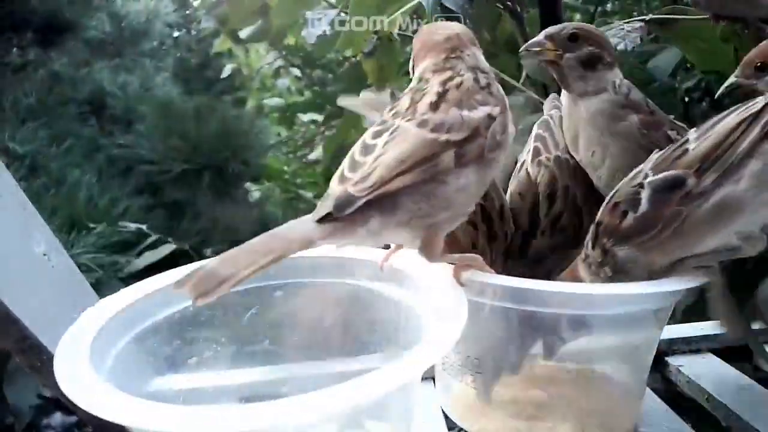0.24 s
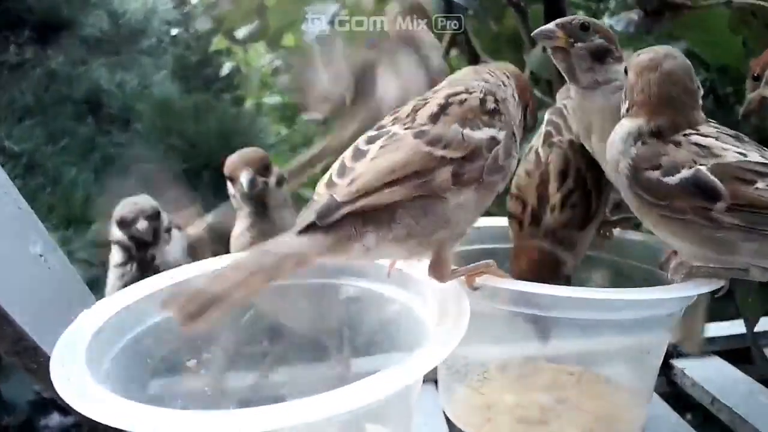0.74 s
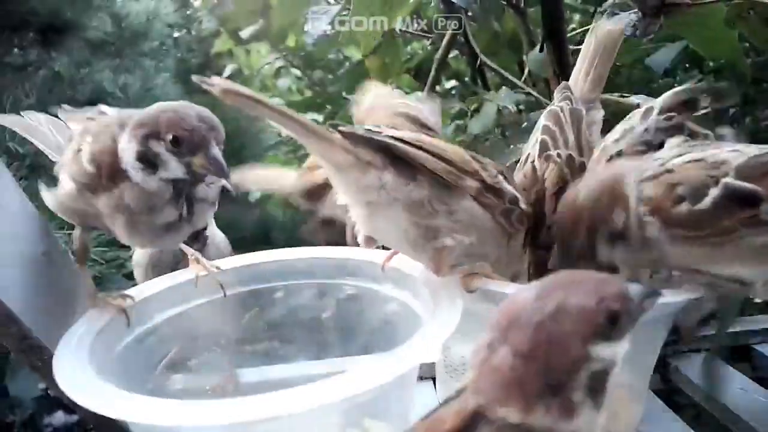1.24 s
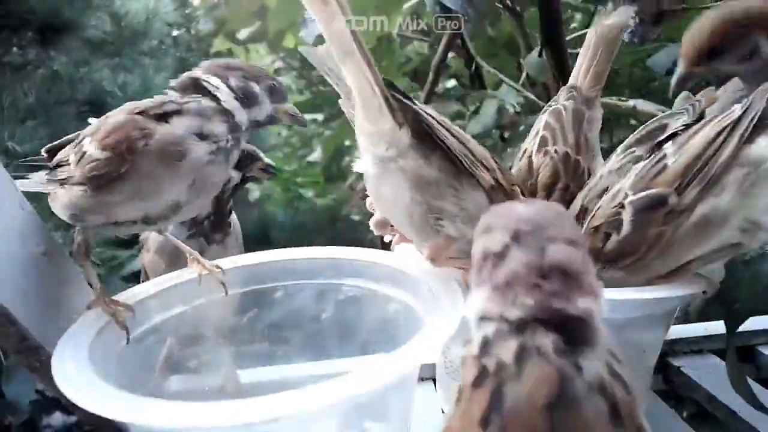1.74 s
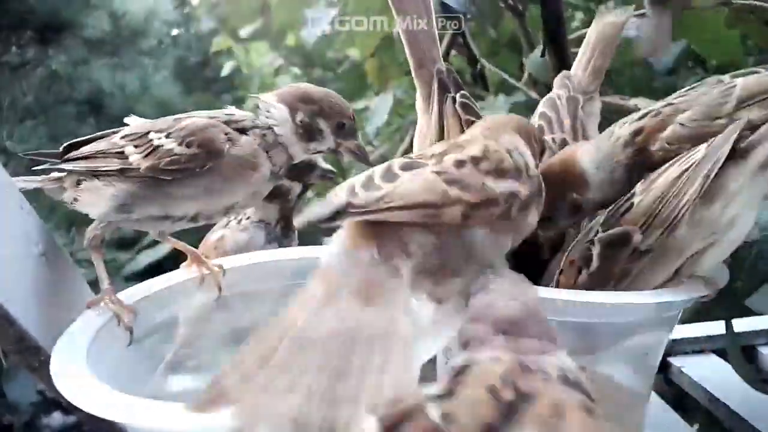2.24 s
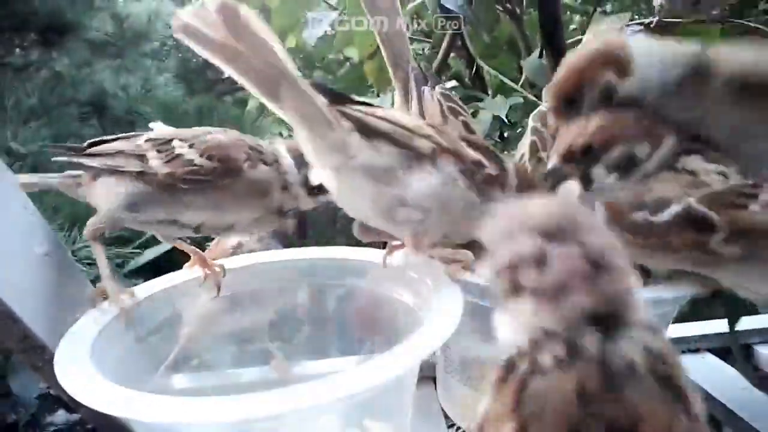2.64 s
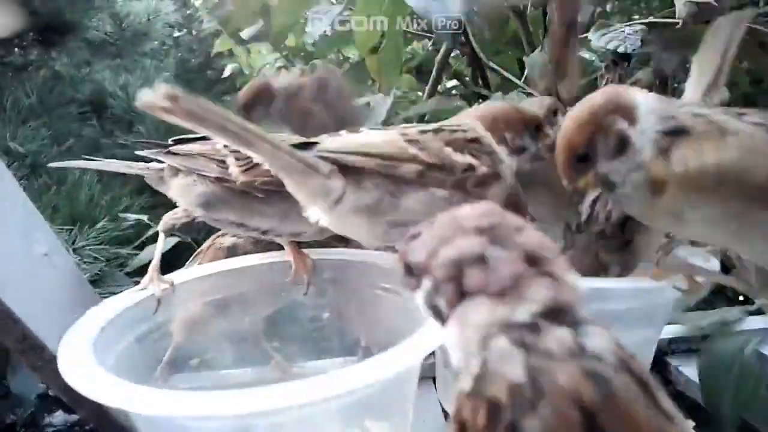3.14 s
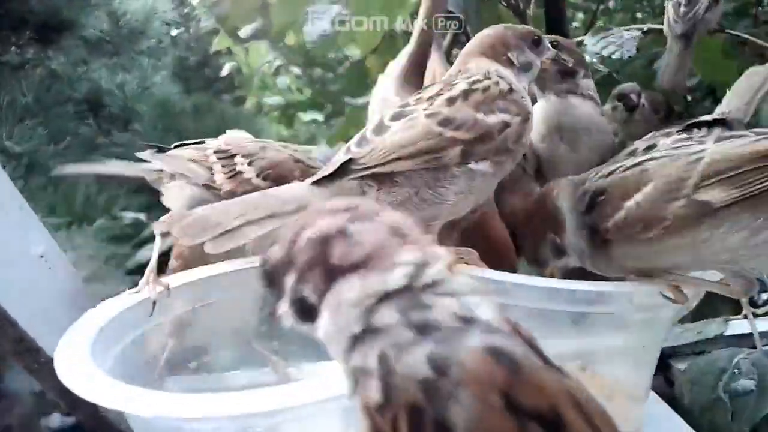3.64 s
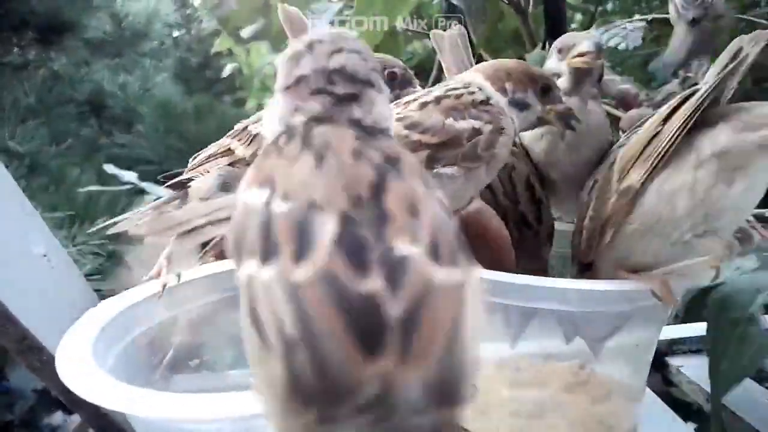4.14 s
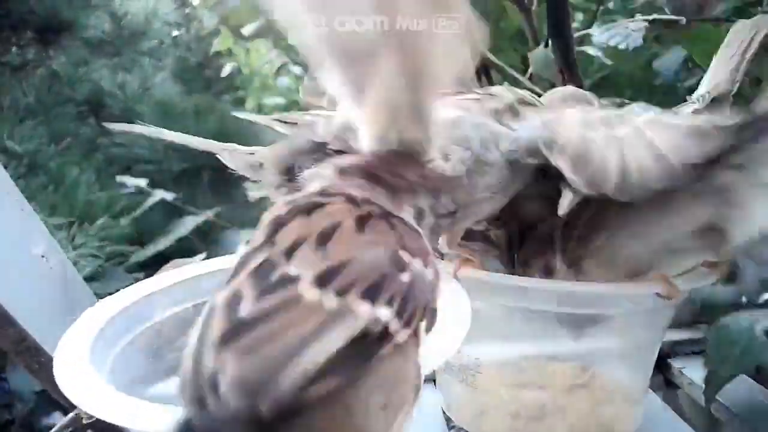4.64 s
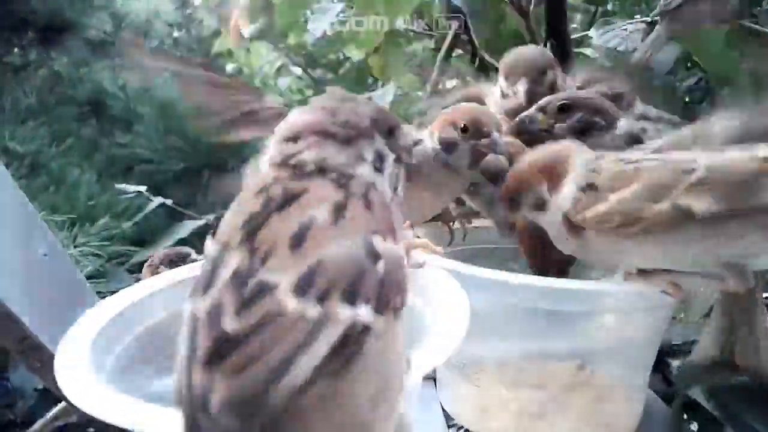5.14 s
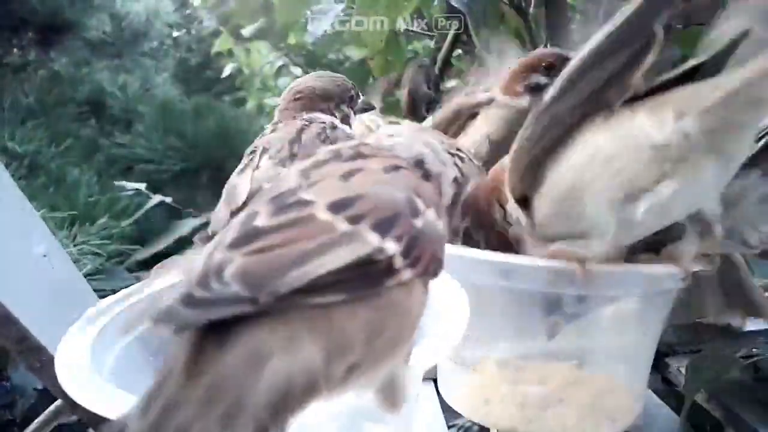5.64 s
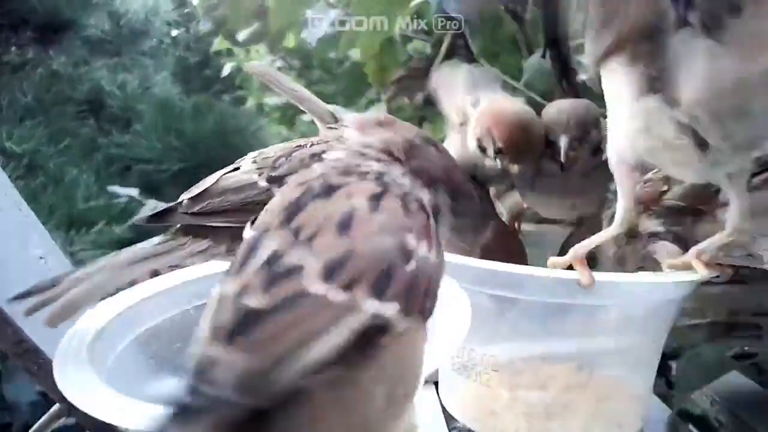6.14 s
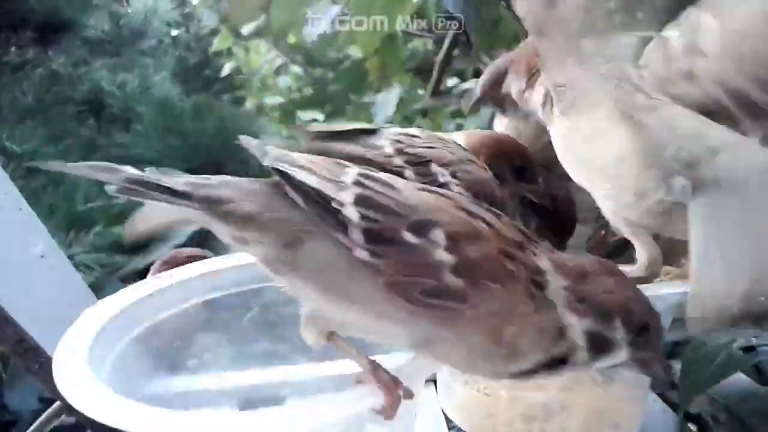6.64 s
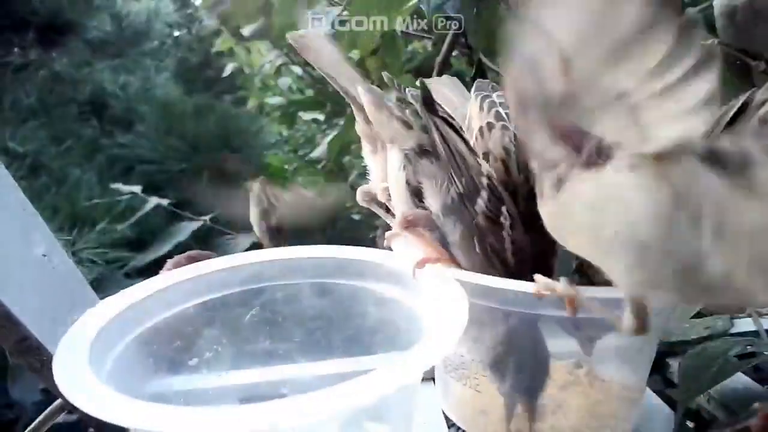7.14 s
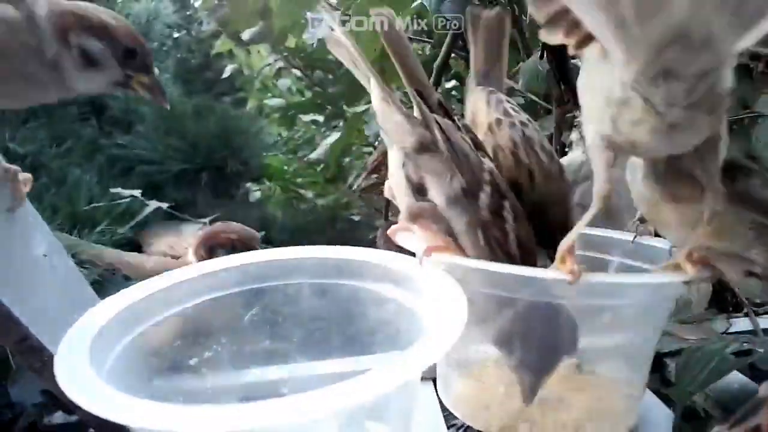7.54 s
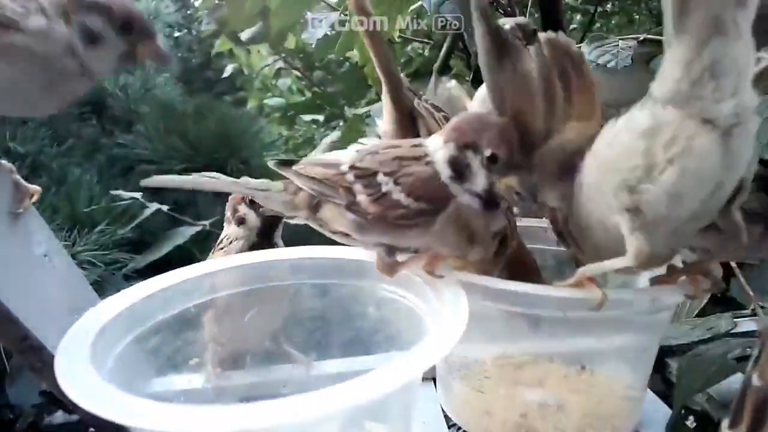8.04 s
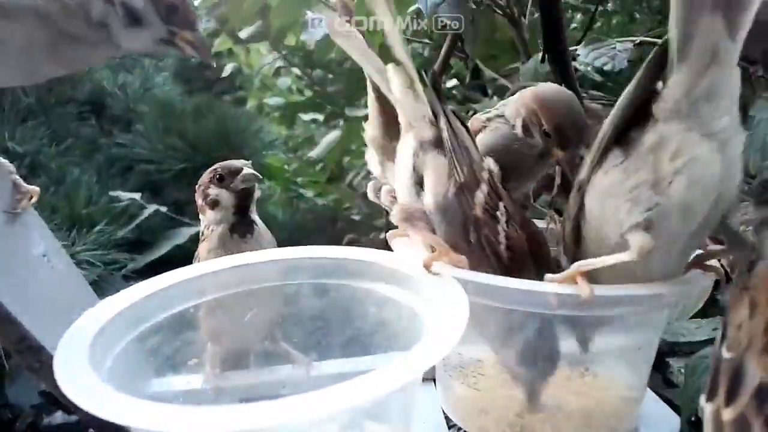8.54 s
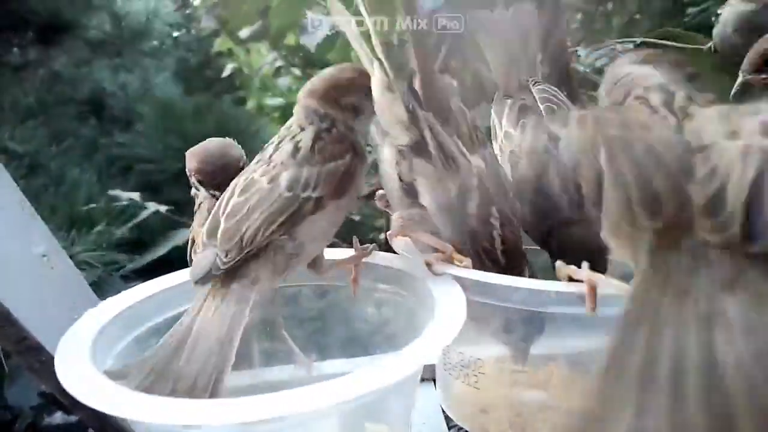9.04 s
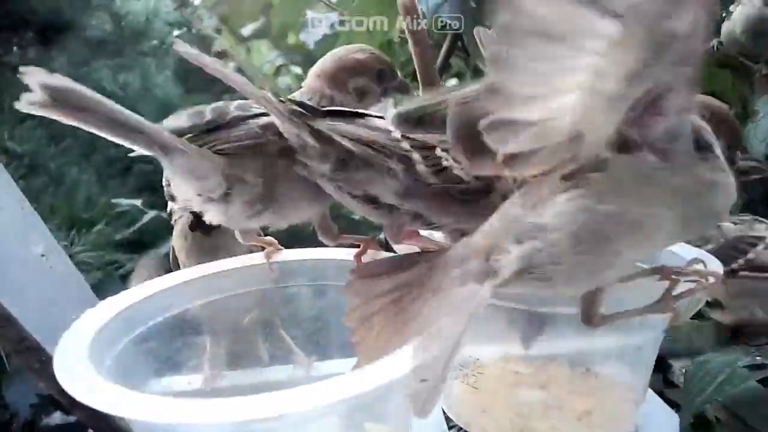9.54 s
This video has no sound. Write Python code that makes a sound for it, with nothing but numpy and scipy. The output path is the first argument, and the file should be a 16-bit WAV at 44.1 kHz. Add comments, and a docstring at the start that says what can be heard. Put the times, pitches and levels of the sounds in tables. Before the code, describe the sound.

Close to the microphone, sparrows hop and peck on thin plastic cups with dry ticks and hollow knocks. Sparse chips and thin whistles come first, one piercing near 2.5 seconds. From about five seconds raspy double chirps crowd together with hard wing flaps and a dull perch bump, continuing to the end over a low outdoor rumble. The sound sits on the left channel.

```python
"""Garden, close microphone: over a low rumble, claws and beaks tick on plastic seed cups and wings rustle and puff.
Tree sparrows join in from 1.2 s with double-arched scolds, single chips and thin whistles, two-voiced and rasping.
Scolds crowd together from about 5 s, with hard wing strokes and, at 6.2 s, one bump on the perch;
a far motor comes up after 8 s. Noise shaped by spectra makes the air and contacts; gliding tones make the calls.
The scene is on the left channel, with only a trace on the right; both carry mains hum and hiss."""
import sys
import numpy as np
from scipy import signal
from scipy.fft import rfft, irfft, next_fast_len
from scipy.io import wavfile
from scipy.ndimage import map_coordinates

SR = 44100
rng = np.random.default_rng(int(sys.argv[2]) if len(sys.argv) > 2 else 0)


def wav_record(signal):
    """Record a signal, one row per channel, as 16-bit PCM in the file named by sys.argv[1]."""
    frames = np.transpose(np.atleast_2d(signal))
    bounded = np.clip(frames, -1, 1)
    # unit amplitude maps onto the largest positive 16-bit level
    quanta = np.round(bounded * 32767).astype(np.int16)
    wavfile.write(sys.argv[1], SR, quanta)


N = 431738  # length [samples]

# Spectra, all relative: (frequency [Hz], density [dB per Hz])
# the garden around the microphone
GARDEN_SPECTRUM = [(59, -13.5), (100, -0.5), (145, -8.5), (178, -3.5), (368, -10.5), (512, -19.5),
                   (859, -18), (1080, -20), (1200, -16.5), (1960, -26), (2970, -36), (3810, -29),
                   (6380, -28.5), (14000, -77)]
# air drifting over the microphone
DRAUGHT_SPECTRUM = [(10, -14), (30, 11), (60, 7.5), (110, 1), (250, -39)]
# dull thud of the perch
PERCH_SPECTRUM = [(40, -9), (120, -2.5), (210, 2), (330, -5), (480, -14), (700, -30), (1500, -57)]
# feathers brushing
RUSTLE_SPECTRUM = [(400, -13), (800, 4.5), (1300, 4), (1800, -4.5), (2600, -2.5), (4500, -7), (7200, -4),
                   (9000, -17), (13000, -71)]
# stiff feathers dragged by a hard stroke
SWISH_SPECTRUM = [(500, -25), (900, -16), (1350, 3), (1900, 3), (2800, 1), (4500, -7), (7000, -2),
                  (10000, -19), (13000, -30)]
HISS_SPECTRUM = [(30, 28), (350, 22), (700, 16), (1400, 7), (2800, 1), (5600, -2), (13000, 0)]

# Low outdoor rumble before its lift in garden(): (time [s], level [dB])
RUMBLE_LEVEL = [(0, -54), (.4, -48.5), (.6, -52), (.95, -48), (1.2, -53), (2.8, -52), (3.2, -47),
                (3.6, -52.5), (4.8, -51), (5.1, -48), (5.6, -50), (6.6, -51), (8, -53), (9.7, -53)]
# Far motor before its lift and fade-in in garden(): (time [s], level [dB])
MOTOR_LEVEL = [(7.9, -62), (8.18, -57), (8.416, -44.5), (9.048, -44.5), (9.122, -55), (9.7, -51)]
# Restlessness between flurries: (time [s], level [dB])
FIDGET_LEVEL = [(0, -60.5), (4.2, -62.5), (5.5, -54.5), (9.7, -59.5)]
# Flurries of wings and jostling bodies: (middle [s], half width [s], level [dB])
FLURRIES = [(0.388, 0.096, -51), (.88, .1, -55.5), (3.102, 0.16, -54.5), (4.602, 0.17, -55.5),
            (5.098, 0.14, -50), (5.42, 0.11, -47), (5.62, .12, -52.5), (5.892, 0.05, -44.5),
            (6.17, 0.11, -51), (6.56, 0.046, -53), (6.85, 0.08, -52.5), (7.6, 0.28, -58.5),
            (8.9, 0.11, -56)]
# Wing puffs at the microphone, before damping: (time [s], level [dB])
WING_PUFFS = [(.759, -29), (0.8, -27), (.844, -25), (.879, -24.5), (0.957, -20), (1.59, -24), (2.987, -27),
              (4.40, -28), (4.537, -29.5), (4.57, -26.5), (5.089, -20.5), (5.132, -23.5), (6.204, -16.5),
              (6.37, -28), (7.269, -25.5), (7.92, -29.5)]
# Hard wing strokes, relative to one another: (time [s], level [dB])
WING_STROKES = [(.37, -55), (1.597, -42), (3.01, -53), (4.614, -49), (5.139, -38), (5.365, -34.5),
                (5.42, -39), (5.468, -44), (5.522, -40), (5.572, -38), (5.648, -40), (5.70, -40),
                (5.765, -36), (5.858, -36), (5.935, -39.5), (6.115, -42), (6.539, -42)]
# Firm pecks and landings, before the lifts in cups(): (time [s], knock level [dB], tick level [dB])
PECKS = [(0.06, -39.5, -54), (.16, -58, -47), (0.362, -40, -44), (0.4, -44, -46.5), (0.4785, -49, -49),
         (0.7555, -45, -62), (0.925, -44, -44), (.989, -57, -46.5), (.9622, -44, -56), (1.1103, -44, -46),
         (1.3808, -45, -44.5), (1.586, -56, -51), (1.5962, -30.5, -37), (1.5524, -55, -51),
         (1.6277, -44.5, -49), (1.6816, -45, -56), (2.071, -45, -57), (2.199, -47, -49), (1.929, -58, -46),
         (2.099, -62, -45), (2.6153, -49, -54), (2.654, -60, -49), (3.0133, -39, -47.5),
         (3.105, -43.5, -39), (3.1368, -60, -46), (3.201, -56, -47.5), (3.3371, -50, -40.5),
         (3.481, -59, -46.5), (3.7337, -65, -47.5), (4.1624, -42.5, -49.5), (4.362, -41.5, -48),
         (4.614, -41, -43.5), (4.691, -44.5, -47), (4.9193, -44, -50), (5.882, -31.5, -58),
         (6.015, -36, -40), (6.1059, -33.5, -39), (6.8397, -51, -43), (6.8685, -47, -43),
         (7.8062, -49, -41), (7.8508, -46, -54), (8.8752, -39.5, -61), (8.8994, -54, -45),
         (9.202, -41.5, -40), (9.6782, -62, -43)]
# Resonances of a cup's hollow body: (frequency [Hz], width [Hz], level [dB])
CUP_BODY = [(810, 310, 1), (1260, 250, 8), (2320, 520, -4.5)]
# Resonances of its stiff rim: (frequency [Hz], width [Hz], level [dB])
CUP_RIM = [(3040, 900, 5), (4170, 1300, 4), (5740, 1600, 5), (7140, 760, 8), (9100, 3000, -7)]

# Radiation of the tones from the open beak: (frequency [Hz], gain [dB])
BEAK_RESPONSE = [(800, -5), (2000, 1.5), (7500, 0.5), (10000, -19.5), (13000, -8)]
# Colour of the rasp: (frequency [Hz], gain [dB])
RASP_RESPONSE = [(1000, -66), (1800, -2), (2600, -2.5), (4200, 0), (5600, -0.5), (6500, -4.5), (7600, -4.5),
                 (9000, -13), (11000, -14.5), (12500, -25)]
# Scolds: (time [s], main arch length [s], main crest [Hz], closing crest [Hz], opening rasp level [dB],
# main level [dB], closing level [dB], octave re tone before OCTAVE_LIFT_DB [dB], relative rasp [dB])
SCOLDS = [(1.245, .039, 4170, 3900, -49.5, -45, -46.5, -14, -4.5),
          (4.857, .017, 4000, 2950, -57, -32.5, -42.5, -30, -5.5),
          (5.165, .055, 4070, 3190, -41.5, -36.5, -39.5, -5, -4),
          (5.377, 0.051, 3820, 3100, -42.5, -41, -35.5, -6.5, -2),
          (5.569, 0.053, 3760, 3130, -42, -37.5, -38.5, 2, 0.5),
          (5.75, .049, 4070, 3160, -39.5, -39.5, -36.5, -3, -1.5),
          (5.949, 0.056, 3860, 3170, -36, -33.5, -33.5, -10, -4),
          (6.128, 0.054, 3850, 3400, -38.5, -28.5, -37, -16.5, -13),
          (6.234, .025, 4030, 2970, -55, -35.5, -40, -17.5, -14),
          (6.313, 0.056, 4090, 3410, -41.5, -28.5, -36.5, -25, -7.5),
          (6.413, .026, 4050, 2960, -49.5, -33.5, -41, -19, -11),
          (6.548, 0.062, 3810, 3140, -41.5, -30.5, -38.5, -27, -9.5),
          (6.959, 0.058, 4190, 3450, -48, -34.5, -32.5, -18.5, -7.5),
          (7.206, 0.053, 4190, 3540, -44.5, -31, -32, -14.5, -8.5),
          (7.396, 0.057, 3970, 3280, -44, -30.5, -36.5, -18, -6),
          (7.73, .051, 3970, 3150, -45, -27.5, -36.5, -44, -18),
          (8.076, 0.05, 3990, 3150, -43.5, -28.5, -37, -27, -12),
          (8.201, 0.027, 4290, 3360, -68, -39, -41, -22, -13),
          (8.459, 0.056, 3875, 3210, -43.5, -31, -37.5, -35, -14),
          (8.648, .025, 4040, 2800, -69, -40.5, -45, -24, -4),
          (8.782, .051, 3995, 3070, -48, -36, -37, -30, -7),
          (9.147, .05, 4190, 3290, -52, -34, -43.5, -30, -14),
          (9.474, 0.023, 4000, 3330, -50, -38.5, -37.5, -26, -5.5)]
# Single arched chips: (time [s], rise [s], fall [s], start [Hz], crest [Hz], level [dB],
# second voice pitch ratio, second voice re first [dB], relative rasp [dB])
CHIPS = [(1.515, 0.013, 0.034, 4060, 4800, -54.5, .86, 0, -1),
         (1.847, .008, 0.026, 3690, 4180, -48.5, 0.71, -3, -1),
         (2.061, 0.039, 0.04, 4980, 5720, -44, .75, -8, -5),
         (2.239, 0.0087, 0.024, 3630, 4100, -46.5, .68, -7.5, -2.5),
         (2.489, 0.015, .012, 4500, 5720, -21, .74, -18, -13.5),
         (2.516, 0.0056, 0.036, 4300, 4710, -32.5, 0.85, -9, -12),
         (2.902, 0.028, 0.021, 2260, 4870, -34.5, .81, -6, -11),
         (2.932, 0.0093, 0.033, 3400, 3534, -35.5, 1.15, -6, -9),
         (3.677, 0.014, 0.037, 4180, 4520, -55, 0.82, -6, -1),
         (4.757, 0.015, 0.046, 4200, 4570, -53, 1, -8, 2),
         (5.006, 0.021, 0.01, 3120, 4900, -27.5, .88, 0, -7.5),
         (5.035, 0.0046, 0.023, 3800, 3750, -28.5, 1.2, -8, -9),
         (5.32, .008, .042, 5300, 5560, -36.5, 0.66, -10.5, -3),
         (5.646, 0.0051, 0.064, 4650, 4830, -39.5, 0.52, -5.5, -7),
         (5.692, 0.017, .04, 3580, 4310, -44.5, .75, 7.5, 1),
         (5.874, .026, .019, 4500, 5350, -26, 0.75, -8.5, -17),
         (6.098, .018, 0.017, 3500, 4150, -29, 1.2, -5.5, -5),
         (6.511, 0.006, .03, 4880, 5110, -35, 0.8, -18, -4),
         (6.63, 0.0069, 0.052, 4320, 4790, -44, 1.04, -8, -7),
         (6.825, 0.018, 0.037, 2300, 2570, -51, 1.3, -5, 4),
         (6.888, .005, 0.01, 4400, 5500, -38.5, 0.57, -10, 0),
         (6.907, 0.0065, 0.0062, 4630, 5330, -29, 0.75, -9, -11),
         (7.047, 0.015, 0.024, 3060, 5100, -30.5, .9, -10, -7),
         (7.095, .01, 0.027, 4080, 4260, -42.5, .79, -2, -9),
         (7.204, .011, 0.047, 4920, 5560, -29, 0.74, -8, -12),
         (7.396, 0.012, 0.045, 4900, 5410, -28, 0.78, -7, -7),
         (7.61, 0.019, .06, 4700, 5310, -33.5, 0.87, -8.5, -7),
         (7.69, 0.029, .016, 3600, 4400, -34, 1.1, -4, -17),
         (7.874, .033, 0.018, 4790, 6340, -48, 0.75, 0, -9),
         (7.924, .011, 0.016, 3930, 4620, -40, 0.93, -5, -5),
         (8.253, .016, 0.041, 4700, 5470, -35.5, 0.8, -6, -3.5),
         (8.289, 0.013, 0.041, 4700, 4950, -31.5, 0.81, -2, -11.5),
         (8.338, 0.024, 0.044, 3280, 4710, -34, 0.79, -1.5, -4.5),
         (8.524, 0.02, 0.053, 2900, 4420, -36, 1.21, -3.5, -5),
         (9.028, 0.028, 0.04, 4630, 5220, -30.5, 0.83, -4, -2.5),
         (9.191, 0.021, 0.026, 4730, 5520, -23.5, 0.81, -6.5, -7.5),
         (9.234, 0.0066, 0.021, 4450, 4840, -25, 0.89, -3.5, -5.5),
         (9.401, .029, .016, 3500, 4670, -24.5, 1.12, -8, -9.5),
         (9.437, 0.0069, .03, 3800, 3590, -29, 1.2, -1, -9),
         (9.54, 0.019, 0.013, 4430, 4860, -39, 1.4, -15, 1),
         (9.57, 0.0073, 0.044, 4200, 3950, -42.5, .88, -0.5, -4)]
# Thin sliding whistles: (time [s], length [s], start [Hz], end [Hz], level [dB])
WHISTLES = [(1.702, 0.044, 6230, 4800, -62), (1.755, .078, 4800, 3950, -52.5),
            (2.122, 0.064, 3100, 5030, -47.5), (4.441, 0.062, 6000, 4430, -61),
            (4.505, 0.041, 4330, 3490, -45), (6.055, .04, 2430, 3790, -32.5),
            (6.658, 0.042, 4200, 3280, -40.5), (6.745, .06, 4740, 4010, -51.5),
            (7.561, 0.048, 2940, 4270, -42), (7.657, 0.034, 4200, 3560, -32.5),
            (7.957, 0.035, 3280, 4980, -46)]

# Decay of the echo close by: (frequency [Hz], time to fall 60 dB [s])
PORCH_DECAY = [(300, 0.04), (3000, 0.06), (10000, 0.089)]
# Decay of the echo from the hedge: (frequency [Hz], time to fall 60 dB [s])
HEDGE_DECAY = [(300, .2), (3000, 0.22), (10000, 0.21)]
# Mains hum at the input: (frequency [Hz], left level [dB], right level [dB])
MAINS_HUM = [(120.3, -56.5, -55.5), (240.5, -59.5, -62), (358, -74.5, -81.5), (480.6, -70.5, -78.5),
             (593.5, -80, -75), (862, -68.5, -82)]

TOP_HZ, HISS_DB = 15650, -65.5  # upper limit of the recorded band; input hiss level
PUFF_HZ = 49  # pitch of the swing of air
STROKE_S = 0.0072  # spread (standard deviation) of a stroke's swish
BUMP_S, BUMP_DB = 6.207, -23  # a bird bumps the perch: time, level

# Scolds: opening rasp's length, centre and relative noise
LEAD_S, LEAD_HZ, LEAD_RASP_DB = 0.024, 4010, 5.5
DIP_HZ, CREST_SHARE = 2555, 0.42  # pitch around the main arch; fraction of its length where it peaks
CLOSE_RISE_S, CLOSE_FALL_S, CLOSE_END_HZ = 0.018, 0.016, 2350  # closing arch after a main arch of usual length
USUAL_S, CLOSE_FOLLOWS = 0.054, 0.47  # usual main arch; hurried scolds close faster too (exponent)
SCOLD_RATIO, SCOLD_SECOND_DB = 1.14, -11  # second voice: pitch ratio, level re first
SCOLD_ONSET_DB, SCOLD_DIP_DB, CLOSE_END_DB = -6.5, -4, -5.5  # level at the start, dip and end, re the crest
CLOSE_SOFTER_DB = -4  # the closing arch has less octave and rasp

# Chips and whistles
CHIP_SAG_OCT_PER_S = 12  # mean fall of a chip's pitch after its crest
CHIP_ONSET_DB, CHIP_END_DB = -12, -9.5  # level at the start and the end, re the crest
WHISTLE_EDGE_DB, WHISTLE_RASP_DB = -4, -16  # level at both ends re the middle; relative rasp

# All calls
PLAIN_OCTAVE_DB, OCTAVE_LIFT_DB = -22.5, 2  # octave of chips, whistles and opening rasps; lift added to every octave
ROUND_ARCH, FLAT_ARCH = 1.7, 3  # exponent of the pitch's fall from a crest; a scold's main arch is flat
BEND, BENDS_PER_S = 0.01304, 90.3  # chance pitch bends shared by both voices: relative depth, rate


def amp(db):
    """Decibels to gain."""
    return 10 ** (np.asarray(db) / 20)


def unit(x):
    """Scale to rms 1."""
    return x / np.sqrt(np.mean(x ** 2) + 1e-20)


def along(points, hz):
    """Interpolate (frequency [Hz], value) points on a log frequency axis."""
    f, v = np.transpose(points)
    return np.interp(np.log(hz + 1), np.log(f + 1), v)


def level_curve(rows):
    """Join (time [s], level [dB]) points into one level per sample."""
    s, db = np.transpose(rows)
    return np.interp(np.arange(N) / SR, s, db)


def wobble(rate, size=N):
    """A smooth random curve with `rate` knots a second."""
    knots = rng.standard_normal(int(size * rate / SR) + 4)
    coarse = np.arange(0, size + 8, 8)  # every eighth sample is smooth enough
    return np.interp(np.arange(size), coarse, map_coordinates(knots, [coarse * rate / SR]))


def filtered(x, response):
    """Multiply the spectrum of x by a complex response of frequency."""
    m = next_fast_len(N + SR // 2)
    spectrum = rfft(x, m) * response(np.fft.rfftfreq(m, 1 / SR))
    return irfft(spectrum, m)[..., :N]


def coloured(x, spectrum):
    """Shape x by (frequency [Hz], gain [dB]) points."""
    return filtered(x, lambda hz: amp(along(spectrum, hz)))


def noise(spectrum):
    """Coloured noise of rms 1."""
    return unit(coloured(rng.standard_normal(N), spectrum))


def ring(x, modes):
    """Excite a set of parallel resonances, alternate in sign, with x."""
    def response(f):
        total = 0
        for k, (centre, width, db) in enumerate(modes):
            damping = 1j * f * width
            total = total + (-1) ** k * amp(db) * damping / (centre ** 2 - f ** 2 + damping)
        return total
    return filtered(x, response)


def add(track, s, x):
    """Mix x into the track at time s."""
    i = max(round(s * SR), 0)
    track[i:i + len(x)] += x[:max(N - i, 0)]


def echo(x, decay):
    """Nearby walls and leaves give a diffuse echo: noise that decays at its own pace in each band."""
    hz, t, z = signal.stft(rng.standard_normal(SR // 3), SR, nperseg=256)
    fading = z * amp(-60 * t / along(decay, hz)[:, None])
    tail = signal.istft(fading, SR, nperseg=256)[1]
    delayed = np.pad(tail / np.linalg.norm(tail), (SR // 300, 0))
    return signal.fftconvolve(x, delayed)[:N]


def garden(rumble_db=6, waver_db=1.4, far_db=-62, whir_db=-61, motor_db=2, motor_hz=94):
    """Low outdoor rumble, a faint far hiss with a narrow whir, and a distant motor as a wavering sine."""
    rumble_level = level_curve(RUMBLE_LEVEL) + rumble_db + waver_db * wobble(9)
    bed = noise(GARDEN_SPECTRUM)
    low = filtered(bed, lambda hz: 1 / (1 + (hz / 550) ** 6))
    t = np.arange(N) / SR
    motor_gain = amp(level_curve(MOTOR_LEVEL) + motor_db) * np.interp(t, [8.1, 8.4], [0.3, 1])
    motor = np.sqrt(2) * motor_gain * np.sin(2 * np.pi * motor_hz * t + 0.27 * wobble(6))
    whir = unit(ring(rng.standard_normal(N), [(824, 87, 0)]))
    far = amp(far_db) * unit(bed - low) + amp(whir_db) * whir
    return amp(rumble_level) * unit(low) + far + motor


def jostling():
    """How hard the birds move: slowly changing fidgeting, with flurries that swell and die away."""
    power = amp(level_curve(FIDGET_LEVEL)) ** 2
    for s, half, db in FLURRIES:
        swell = amp(db) * np.hanning(round(4 * half * SR))
        add(power, s - 2 * half, swell ** 2)
    return np.sqrt(power)


def draught(effort, still_db=-51, stirred_db=5, gust_db=2.5):
    """Air drifts over the microphone in gusts of low noise, more when wings stir it."""
    strength = amp(still_db) + amp(stirred_db) * effort
    return strength * amp(gust_db * wobble(7)) * noise(DRAUGHT_SPECTRUM)


def bump(rise_s=0.0072):
    """The perch gives one dull thud that swells and dies within a few hundredths of a second."""
    u = np.maximum(np.arange(N) / SR - BUMP_S, 0) / rise_s
    return amp(BUMP_DB) * u * np.exp(1 - u) * noise(PERCH_SPECTRUM)


def wing_puffs(life=0.44):
    """A downstroke pushes one quickly damped swing of air at the microphone."""
    out, t = np.zeros(N), np.arange(SR // 8) / SR
    cycles = PUFF_HZ * t
    swing = -np.sin(2 * np.pi * cycles) * np.exp(-(cycles / life) ** 2 / 2)
    for s, db in WING_PUFFS:
        add(out, s, amp(db) * swing)
    return out


def wing_strokes():
    """Each hard stroke drags stiff feathers over cups and neighbours in a short, grainy swish."""
    level, t = np.zeros(N), np.arange(-SR // 20, SR // 20) / SR
    for s, db in WING_STROKES:
        add(level, s + t[0], amp(db) * np.exp(-(t / STROKE_S) ** 2 / 2))
    grain = amp(3.1 * np.tanh(wobble(400)))
    return level * unit(grain * noise(SWISH_SPECTRUM))


def feathers(effort, rustle_db=-4, stroke_db=7, crackle_rate=170, crackle_db=-2):
    """Feathers brush past each other in quick strokes, and stiff quills crackle as they slip."""
    strokes = unit(amp(stroke_db * np.tanh(wobble(55))))
    slips = (rng.random(N) < crackle_rate / SR) * np.clip(rng.standard_normal(N), -2, 2)
    crackle = amp(crackle_db) * unit(coloured(slips, RUSTLE_SPECTRUM))
    rustle = amp(rustle_db) * noise(RUSTLE_SPECTRUM)
    return effort * strokes * (rustle + crackle)


def cups(effort, knock_s=0.02, tick_s=0.013, knock_db=14, tick_db=9, claw_rate=32, claw_knock_db=17, claw_tick_db=8):
    """Short scratchy contacts knock the cup's body and tick on its rim."""
    # light claw steps at chance times, stronger when the birds jostle
    strength = amp(7.2 * np.clip(rng.standard_normal((2, N)), -2, 2))
    steps = (rng.random((2, N)) < claw_rate / SR) * strength
    scratch = rng.standard_normal(90) * np.hanning(180)[90:] / 2
    force = np.sqrt(effort * effort.mean())
    body, rim = (np.convolve(step, scratch)[:N] * force for step in steps)
    body, rim = body * amp(claw_knock_db), rim * amp(claw_tick_db)
    # firmer pecks and landings: noise bursts falling 60 dB in knock_s or tick_s
    t = np.arange(SR // 20) / SR
    for s, knock, tick in PECKS:
        add(body, s, amp(knock + knock_db - 60 * t / knock_s) * rng.standard_normal(len(t)))
        add(rim, s, amp(tick + tick_db - 60 * t / tick_s) * rng.standard_normal(len(t)))
    return ring(body, CUP_BODY) + ring(rim, CUP_RIM)


# A note: three times, pitches and levels (start, crest, end), then second voice pitch ratio and level,
# octave level, relative rasp level and arch exponent.
def whistle_notes(ratio=0.88, second_db=-14):
    """A whistle is a nearly pure slide that swells in the middle."""
    for s, length, start_hz, end_hz, db in WHISTLES:
        times = (s, s + length / 2, s + length)
        pitches = (start_hz, np.sqrt(start_hz * end_hz), end_hz)
        levels = (db + WHISTLE_EDGE_DB, db, db + WHISTLE_EDGE_DB)
        yield times, pitches, levels, ratio, second_db, PLAIN_OCTAVE_DB, WHISTLE_RASP_DB, 1


def chip_notes():
    """A chip moves to its crest pitch as it swells, then sags and fades."""
    for s, rise, fall, start_hz, hz, db, ratio, second, rasp in CHIPS:
        times = (s, s + rise, s + rise + fall)
        pitches = (start_hz, hz, hz * 2 ** (-CHIP_SAG_OCT_PER_S * fall))
        levels = (db + CHIP_ONSET_DB, db, db + CHIP_END_DB)
        yield times, pitches, levels, ratio, second, PLAIN_OCTAVE_DB, rasp, ROUND_ARCH


def scold_notes():
    """A scold opens with a rasp, leaps from the dip pitch to a flat crest, drops back, then arches again, lower."""
    voices = (SCOLD_RATIO, SCOLD_SECOND_DB)
    for s, length, hz, close_hz, lead_db, db, close_db, octave, rasp in SCOLDS:
        # opening rasp
        times = (s - LEAD_S, s - LEAD_S / 2, s)
        levels = (lead_db + SCOLD_ONSET_DB, lead_db, lead_db)
        yield times, (LEAD_HZ,) * 3, levels, *voices, PLAIN_OCTAVE_DB, LEAD_RASP_DB, ROUND_ARCH
        # main arch
        dip = s + length
        times = (s, s + CREST_SHARE * length, dip)
        levels = (db + SCOLD_ONSET_DB, db, db + SCOLD_DIP_DB)
        yield times, (DIP_HZ, hz, DIP_HZ), levels, *voices, octave, rasp, FLAT_ARCH
        # closing arch
        pace = (length / USUAL_S) ** CLOSE_FOLLOWS
        times = (dip, dip + pace * CLOSE_RISE_S, dip + pace * (CLOSE_RISE_S + CLOSE_FALL_S))
        pitches = (DIP_HZ, close_hz, CLOSE_END_HZ)
        levels = (close_db, close_db, close_db + CLOSE_END_DB)
        yield times, pitches, levels, *voices, octave + CLOSE_SOFTER_DB, rasp + CLOSE_SOFTER_DB, ROUND_ARCH


def voice(hz, warble, jitter, shimmer_db):
    """One side of the syrinx: a complex tone that warbles in pitch and flutters in strength."""
    n = len(hz)
    unsteady_hz = hz * (1 + warble * wobble(169.6, size=n) + jitter * wobble(711, size=n))
    phase = 2 * np.pi * np.cumsum(unsteady_hz) / SR
    flutter = unit(amp(2 * shimmer_db * np.tanh(wobble(243, size=n))))
    return np.exp(1j * phase) * flutter


def screech(hz, spacing_hz=680, spread_db=6.0, upper_db=-3):
    """Forced hard, the syrinx turns chaotic: unsteady sidebands come and go around the tone and its octave."""
    out = np.zeros(len(hz))
    spacing = spacing_hz * np.exp(0.15 * rng.normal())
    for multiple, db in ((1, 0), (2, upper_db)):
        for k in (-2, -1, 1, 2):
            band_hz = multiple * hz + spacing * (k + 0.25 * rng.normal())
            band = voice(band_hz, warble=0.0215, jitter=0.016, shimmer_db=8.0).real
            out += amp(db + spread_db * rng.normal()) * band
    return unit(out)


def from_crest(u, values, exponent):
    """Leave the middle value by a power law towards the start (u = -1) and the end (u = 1)."""
    start, crest, end = values
    return crest - np.where(u < 0, crest - start, crest - end) * np.abs(u) ** exponent


def sparrows(fade=0.003, rasp_lead=0.012, sum_db=-4, screech_db=-1, hiss_db=-8,
             lock_db=3, hold=1.25, echo_db=-44, echo_growth=0.34):
    """Each note bends about its crest; the two sides of the syrinx sound together and mix."""
    tones, rasps, echoes = np.zeros(N), np.zeros(N), np.zeros(N)
    for note in [*scold_notes(), *chip_notes(), *whistle_notes()]:
        times, pitches, dbs, ratio, second, octave, rasp, arch = note
        t = np.arange(times[0] - rasp_lead, times[2] + rasp_lead, 1 / SR)
        u = np.interp(t, times, [-1, 0, 1])
        hz = from_crest(u, pitches, arch) * (1 + BEND * wobble(BENDS_PER_S, size=len(t)))
        inside = np.minimum(t - times[0], times[2] - t)
        gate = np.sin(np.pi / 2 * np.clip(inside / fade + 0.93, 0, 1)) ** 2
        level = np.sqrt(2) * amp(from_crest(u, dbs, hold))
        a = voice(hz, warble=0.0185, jitter=0.016, shimmer_db=3.0)
        b = amp(second) * voice(hz * ratio, warble=0.029, jitter=0.012, shimmer_db=7.5)
        # products of the voices: the octave of the first and the sum of both pitches
        overtones = amp(octave + OCTAVE_LIFT_DB) * a * (a + amp(sum_db) * b)
        tone = gate * level * (a + b + overtones).real
        add(tones, t[0], tone)
        # fainter birds are farther off, so relatively more of their sound comes back from the hedge
        add(echoes, t[0], tone * amp(echo_db + (echo_growth - 1) * max(dbs)))
        # the rasp starts just before the tone and eases as the tone locks in
        rough = amp(screech_db) * screech(hz) + amp(hiss_db) * rng.standard_normal(len(t))
        swell = np.clip(inside / rasp_lead + 1, 0, 1) ** 2
        rasp_level = np.sqrt(level * level.mean()) * amp(rasp - lock_db * u)
        add(rasps, t[0], rasp_level * swell * rough)
    return coloured(tones + echo(echoes, HEDGE_DECAY), BEAK_RESPONSE) + coloured(rasps, RASP_RESPONSE)


def scene():
    """Everything reaches the left channel through a small, dull microphone; a trace leaks into the right."""
    effort = jostling()
    birds = wing_strokes() + feathers(effort) + cups(effort) + sparrows()
    air = garden() + draught(effort) + bump() + wing_puffs() + birds + amp(-10) * echo(birds, PORCH_DECAY)
    microphone = coloured(air, [(10500, 0), (12500, -5), (15000, -5)])
    return microphone * amp([[0], [-47]])


def record(dry):
    """The input adds mains hum and hiss to both channels and limits the band."""
    t = np.arange(N) / SR
    hum = np.zeros((2, N))
    for hz, left, right in MAINS_HUM:
        hum += np.sqrt(2) * amp([[left], [right]]) * np.sin(2 * np.pi * (hz * t + rng.random()))
    hiss = amp(HISS_DB) * np.array([noise(HISS_SPECTRUM) for _ in dry])
    return filtered(dry + hum + hiss, lambda hz: hz < TOP_HZ)


dry = scene()
out = record(dry)
wav_record(out)
```